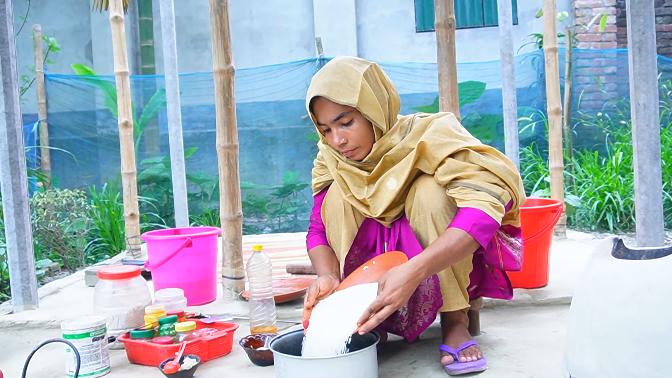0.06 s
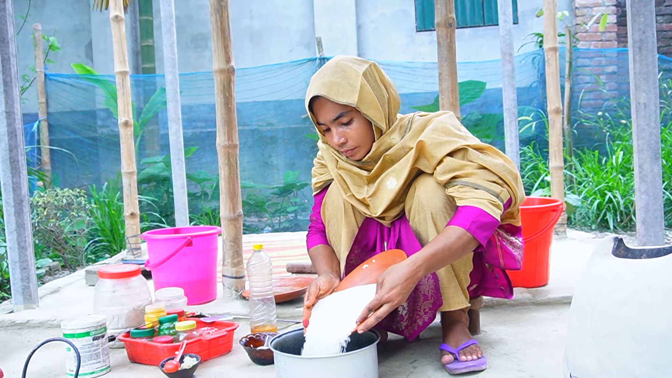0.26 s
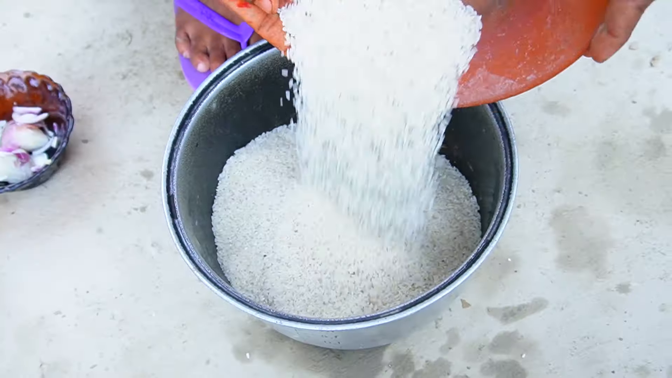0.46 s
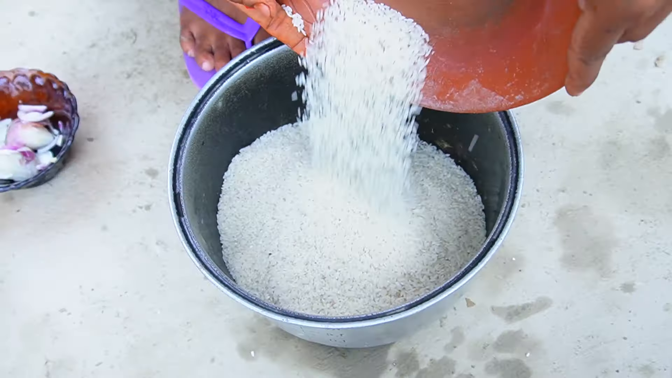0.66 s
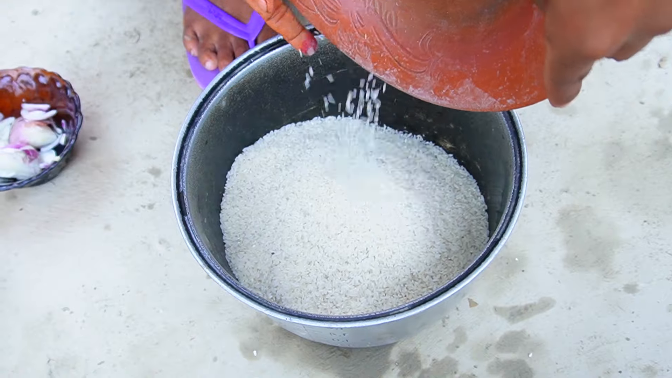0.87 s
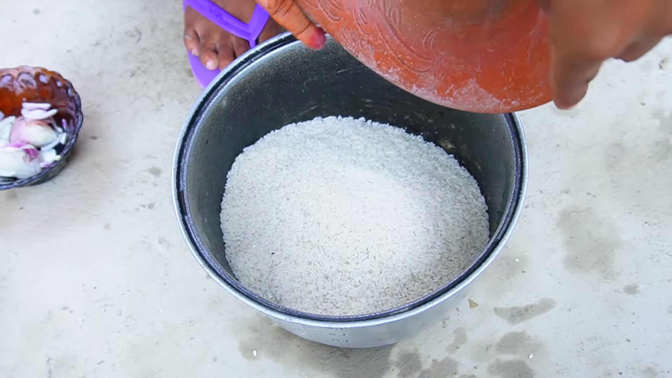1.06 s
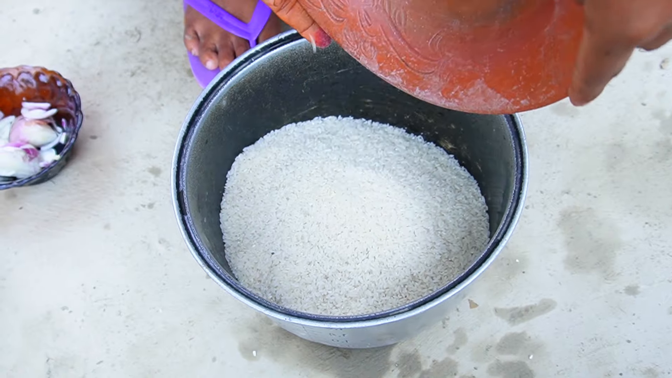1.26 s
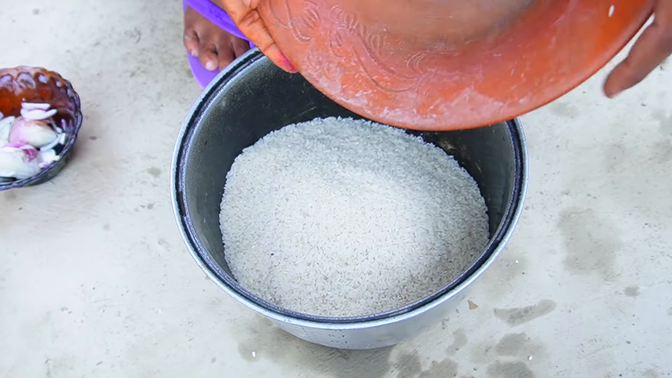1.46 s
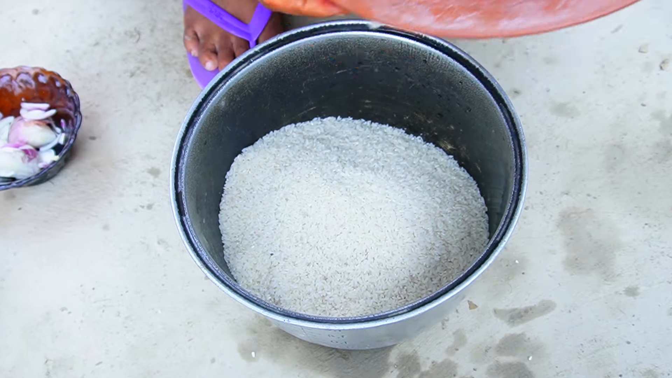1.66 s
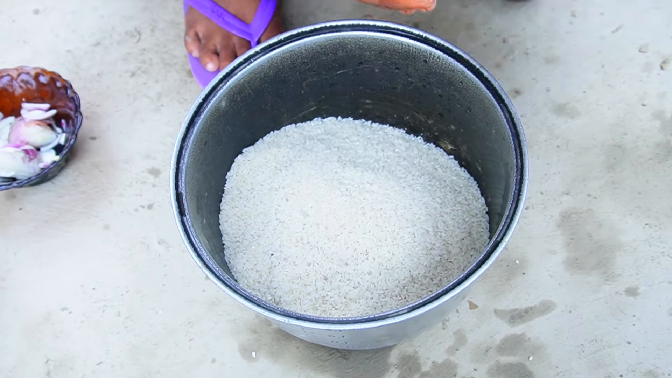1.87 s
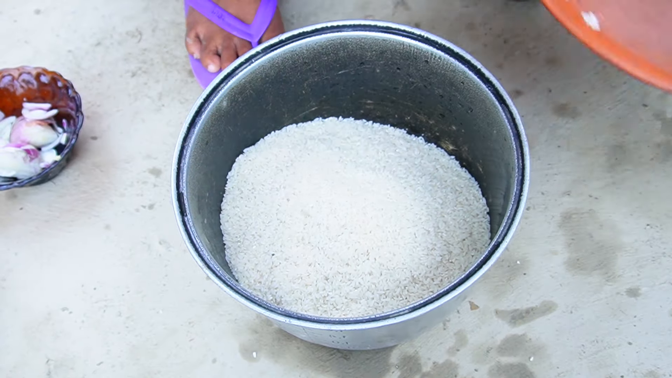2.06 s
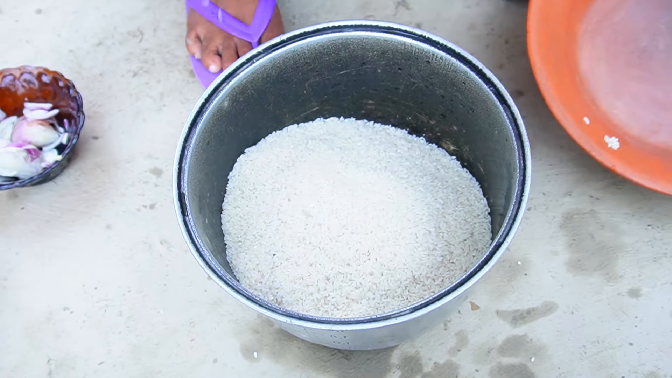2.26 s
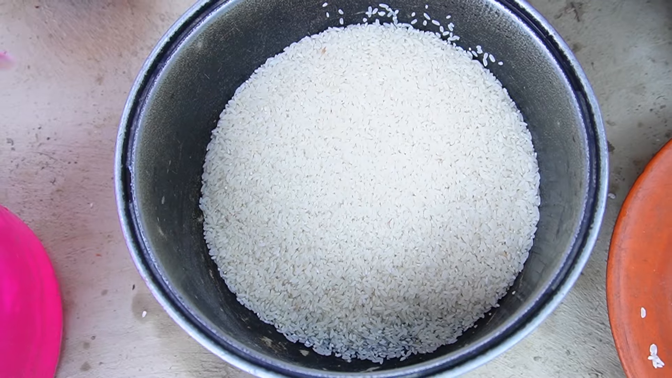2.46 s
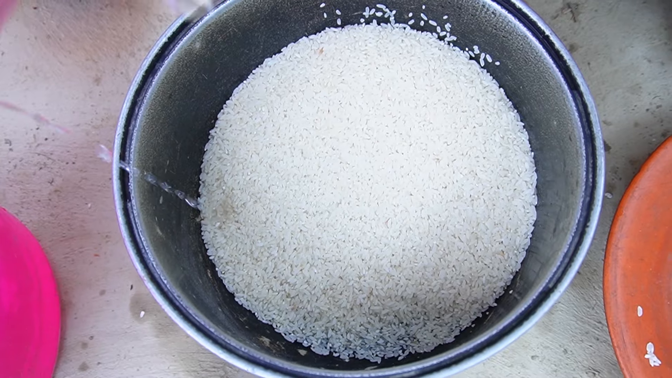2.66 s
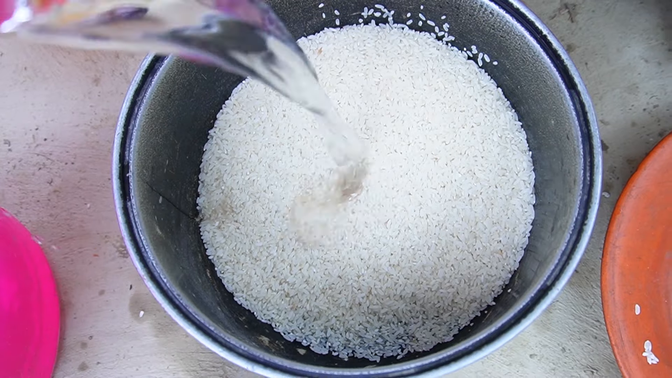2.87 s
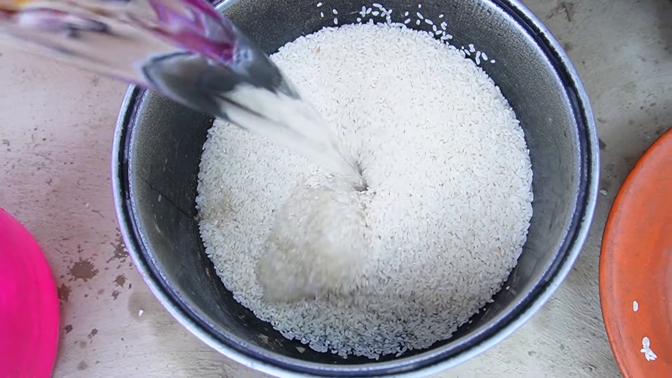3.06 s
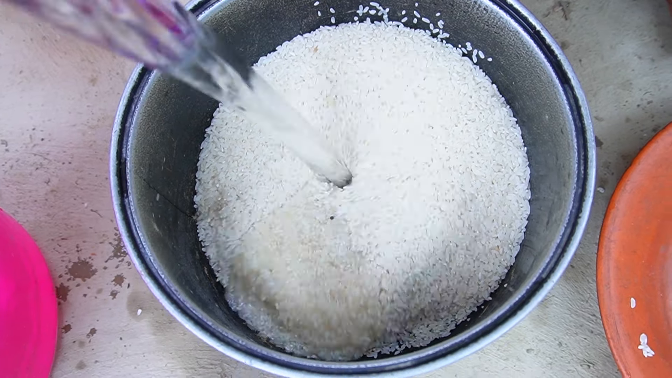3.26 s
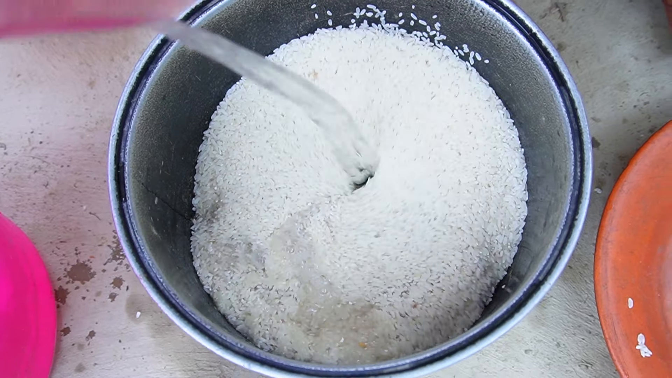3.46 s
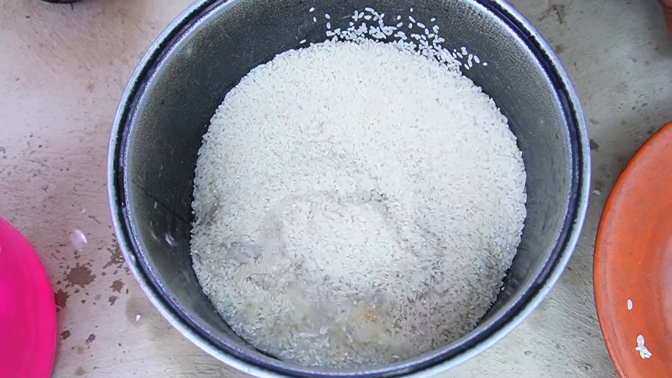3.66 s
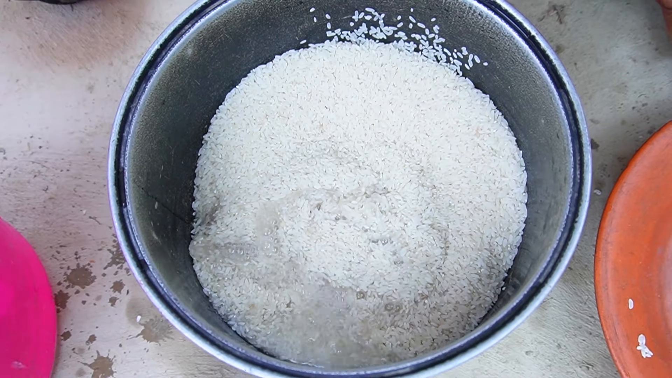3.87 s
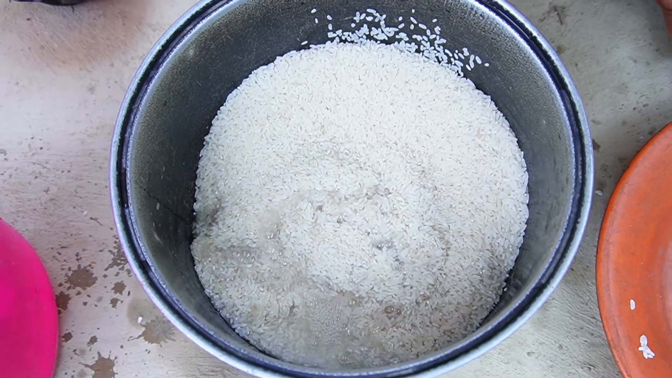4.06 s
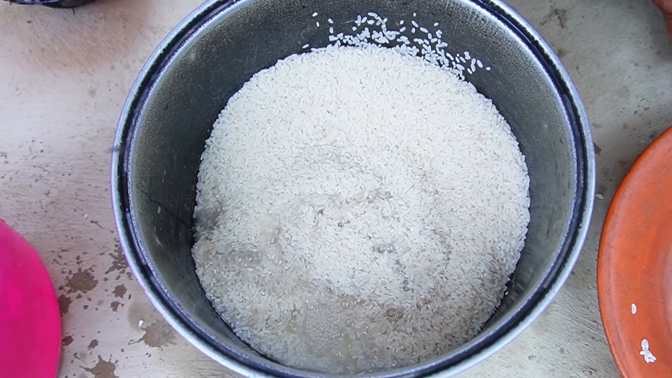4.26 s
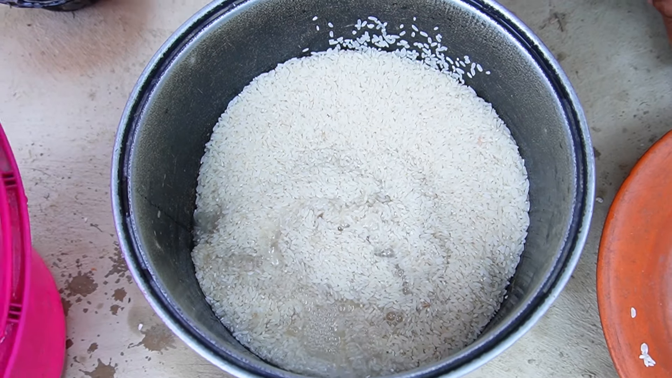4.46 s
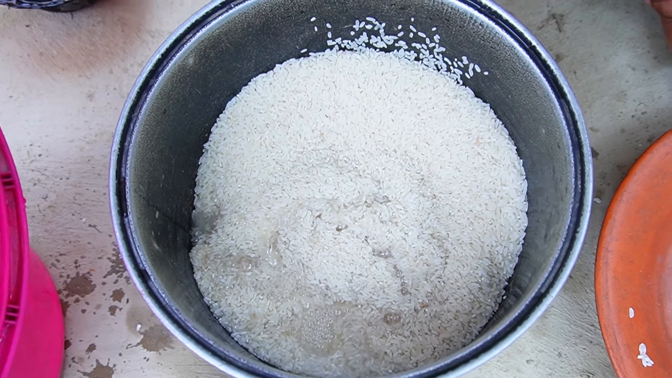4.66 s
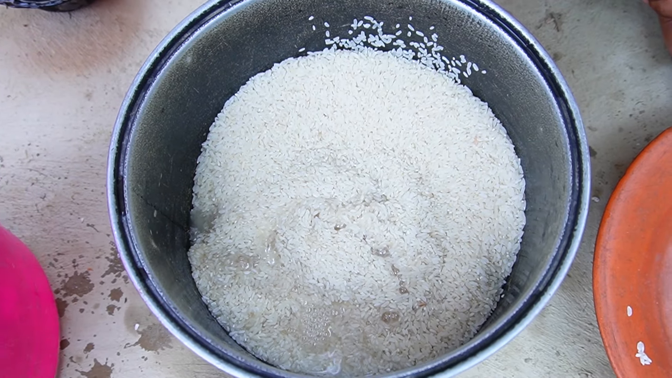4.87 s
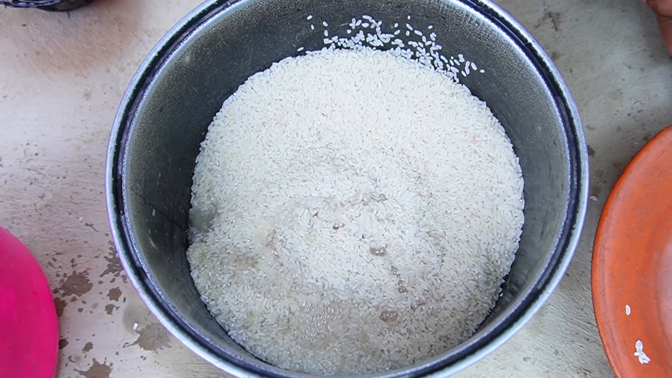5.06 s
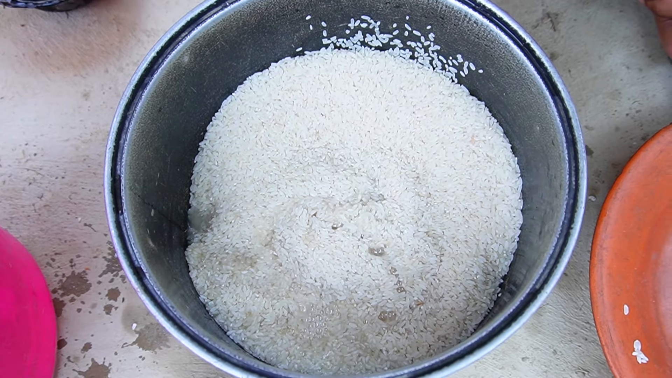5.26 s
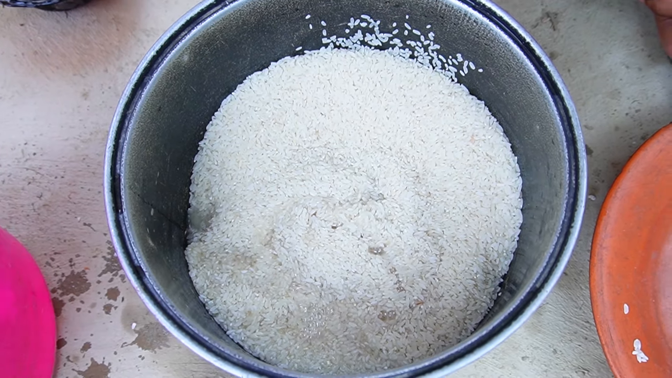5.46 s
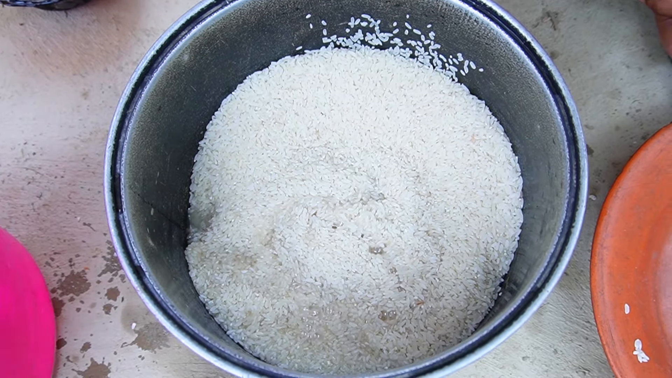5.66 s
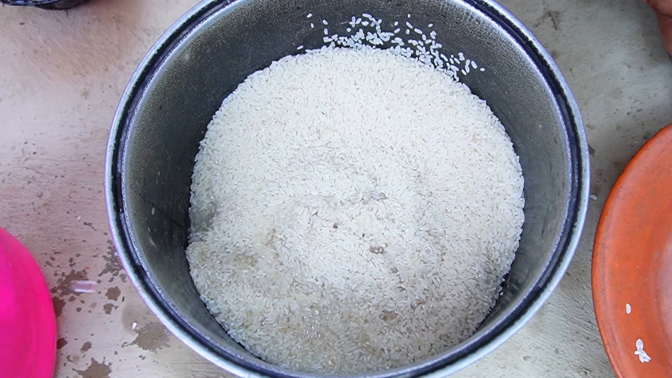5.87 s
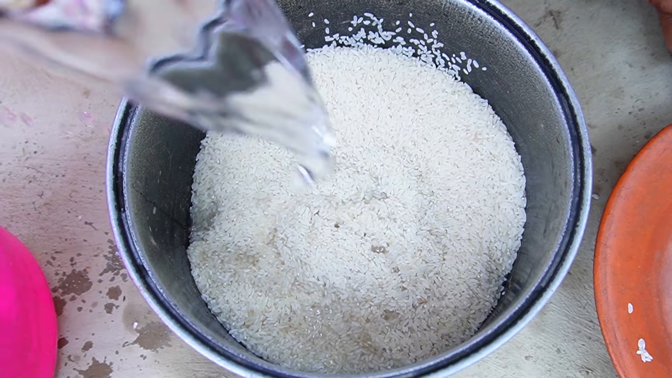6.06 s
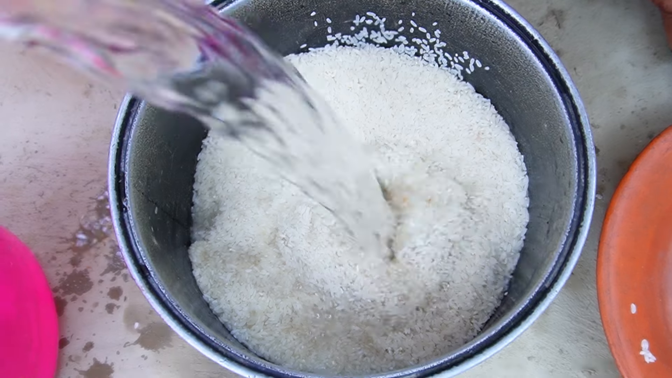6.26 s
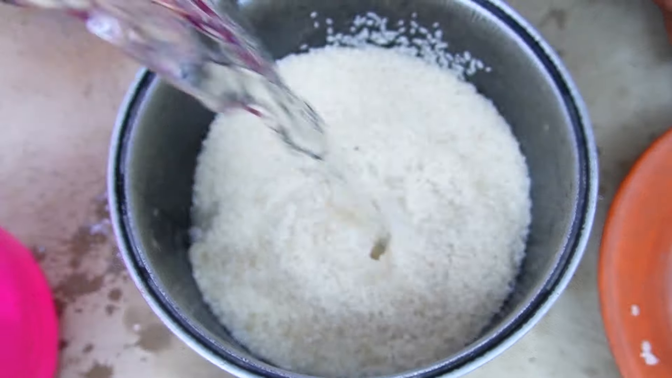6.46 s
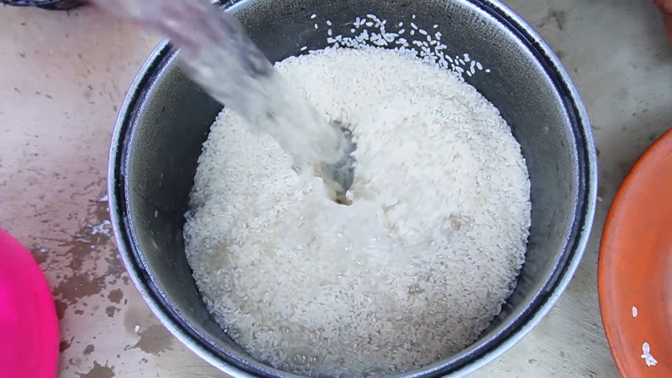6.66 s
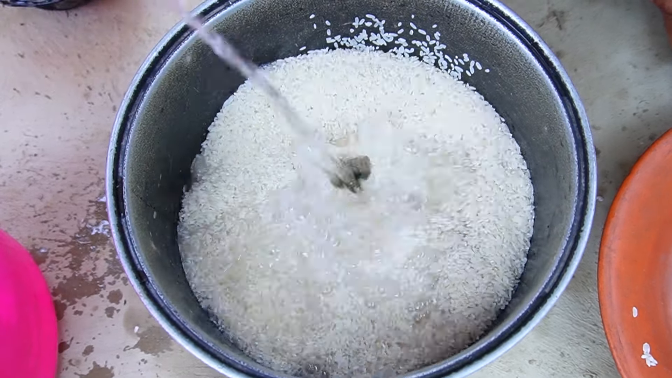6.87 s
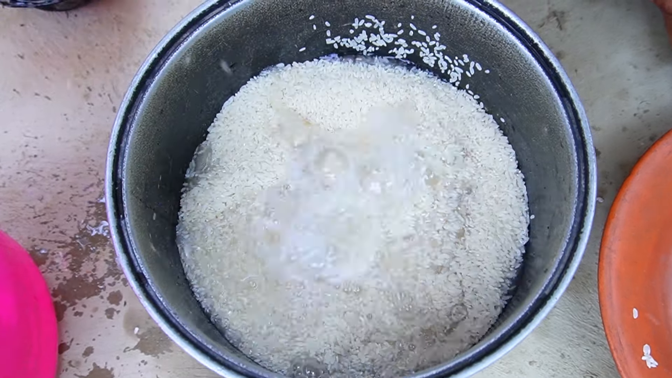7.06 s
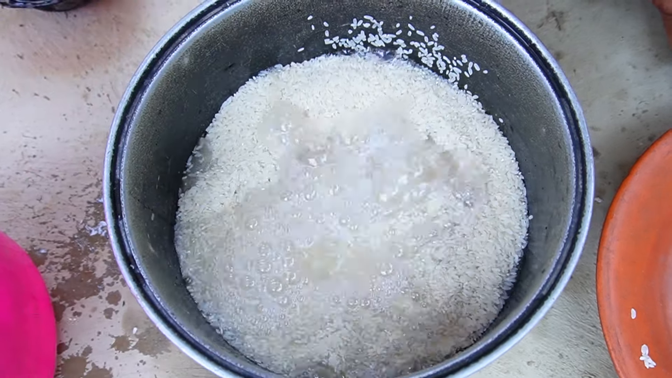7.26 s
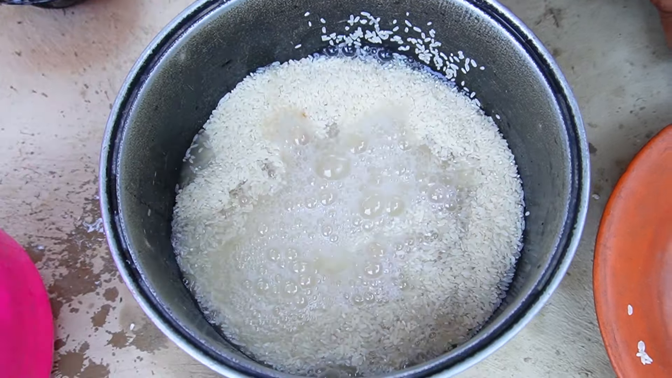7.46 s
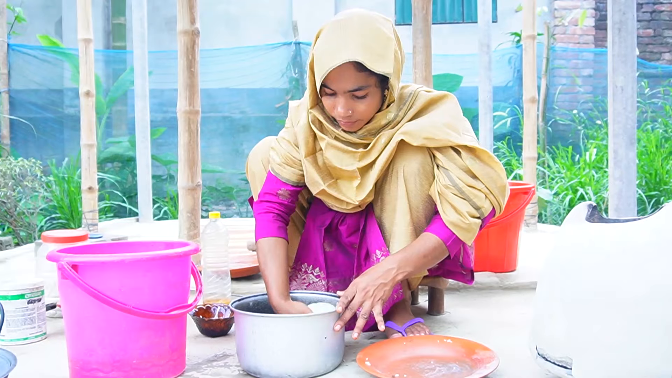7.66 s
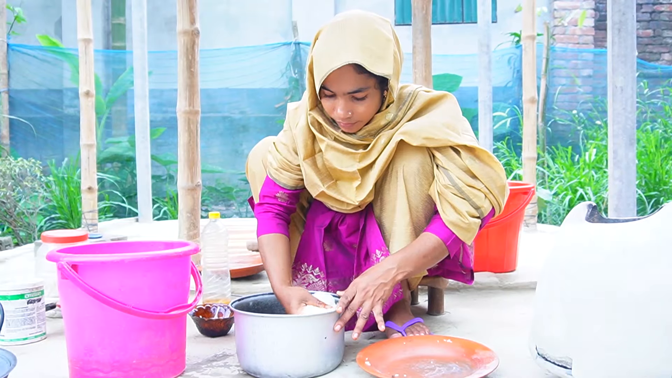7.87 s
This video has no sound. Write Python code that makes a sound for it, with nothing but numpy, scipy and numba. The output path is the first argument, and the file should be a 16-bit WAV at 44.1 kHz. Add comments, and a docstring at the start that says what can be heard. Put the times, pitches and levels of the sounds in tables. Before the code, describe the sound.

Dry rice hisses into a metal pot, a bird chirps, then water splashes onto it, a jug dips and gulps, and water pours again.

```python
"""Rice, water and a bird outdoors

Raw rice slides off a plate into a metal pot while a bird calls; a jug of water is poured on it, dipped into
a bucket to refill and poured again; last drops fall and a hand starts to stir. Rice, bubbles and grit are
swarms of decaying sines, slaps are noise bursts ringing the vessels, the bird is a rasp turning to whistle.
Underneath: low rumble, faint hiss and, later, a low hum."""
import sys
import numpy as np
from scipy import signal
from scipy.fft import rfft, irfft
from scipy.io import wavfile
from numba import njit

SR = 44100
rng = np.random.default_rng(int(sys.argv[2]) if len(sys.argv) > 2 else 0)


def unload_audio(sound):
    """Save the sound as a 16-bit wav file, at the path given as the first command line argument."""
    columns = np.transpose(np.atleast_2d(sound))
    # keep every value between -1 and 1, then stretch to whole-number steps
    steps = np.round(np.clip(columns, -1, 1) * 32767)
    wavfile.write(sys.argv[1], SR, steps.astype(np.int16))


N = 349713
T = np.arange(N) / SR
FREQS_HZ = np.maximum(np.fft.rfftfreq(N, 1 / SR), 1)
TOP_HZ = 15800

# rice off the plate, then the rest shaken out: start_s, stop_s, level_db, trickle_t60_s
RICE_SLIDES = [(0, 0.75, -29.5, 0.8), (1.515, 1.587, -41, 0.33)]
# rice spectrum: freq_hz, gain_db
RICE_SPECTRUM = [(1200, -34), (2800, -23.5), (4000, -5.5), (5200, 1.5), (8000, 3), (15500, -2.5)]
RICE_ATTACK_S = 0.0016
# grains and droplets ticking on hard surfaces: start_s, peak_db, lowest_hz
TICKS = [(0.0094, -9, 3970), (0.039, -7.5, 4160), (0.0533, -10.5, 3900), (0.1196, -17, 3800),
         (0.2837, -12.5, 5000), (1.272, -30.5, 3300), (2.047, -32.5, 3670), (2.757, -26, 5500),
         (2.776, -23, 6250), (2.806, -17, 5960), (3.999, -20.5, 5530)]

# outdoor rumble spectrum: freq_hz, gain_db
RUMBLE_SPECTRUM = [(25, -35), (70, 0.5), (140, -10.5), (200, -3.5), (300, -22), (700, -33.5), (2500, -39.5),
                   (4000, -68.5)]
# hiss spectrum: freq_hz, gain_db
HISS_SPECTRUM = [(2750, -21), (3130, 1), (5000, 0), (7400, -10), (7900, -16.5), (9400, -20.5),
                 (10200, -48.5), (15000, -56)]
RUMBLE_DB, HISS_START_DB = -59.5, -52.5
LATER_S, HISS_STEP_DB, HUM_DB = 2.39, -2.5, -55

# rubs and bumps of plate and jug: start_s, length_s, pitch_hz, width_hz, level_db
RUBS = [(0.392, 0.23, 1470, 497, -55.5), (1.265, 0.13, 422, 49.4, -60.5), (1.449, 0.25, 2620, 230, -46),
        (2.178, 0.11, 1080, 220, -60), (2.419, 0.25, 70, 35, -48.5), (2.658, 0.1, 137, 29.8, -47),
        (2.803, 0.044, 1770, 500, -59.5), (4.589, 0.057, 193, 90, -36), (4.927, 0.054, 119, 69.6, -42.5)]
# bird notes: start_s, length_s, pitch_hz, relative_level_db, rasp_vs_whistle_db
BIRD_NOTES = [(0.655, 0.06, 5055, -10.5, -2.5), (0.709, 0.086, 3280, -9, -5), (0.41, 0.19, 2586, -42, 4),
              (1.912, 0.09, 2710, -47.5, 6.5), (2.49, 0.081, 2640, -53.5, 2),
              (5.736, 0.071, 2680, -45.5, 2.5)]
SQUEAK_S, SQUEAK_LENGTH_S, SQUEAK_DB = 1.546, 0.44, -56.5
SQUEAK_FROM_HZ, SQUEAK_TO_HZ = 800, 1036

# jugs emptied on the rice: start_s, stop_s, attack_s, swell_db, puddle_time_constant_s,
# spray_db, small_bubbles_db, deep_bubbles_db, cutoff_t60_s, soaking_fizz_db
POURS = [(2.879, 3.647, 0.029, 10, 0.14, -10.5, -16.5, -51, 0.12, -24.5),
         (6.199, 6.991, 0.068, 2, 0.073, -11.5, -14.5, -23.5, 0.19, -10.5)]
# stream on rice, spectrum: freq_hz, gain_db
POUR_SPECTRUM = [(220, -9), (320, -22), (400, -12.5), (630, -3), (780, -8), (1400, 2.5), (3300, 5.5),
                 (6200, 1), (9000, -4.5), (15500, -12.5)]
FIRST_BUBBLE_HZ = 4640  # lowest pitch on dry rice; sinks as the puddle deepens
SOAK_T60_S, SETTLE_T60_S = 1, 0.76  # fizz of soaking; larger bubbles settle sooner
POT_HZ, POT_WIDTH_HZ, POT_VS_SMALL_DB = 580, 120, -28.5
# hollows drilled in dry rice by the stream: start_s, length_s, pitch_hz, level_db
HOLLOWS = [(2.962, 0.029, 3730, -21.5), (3.015, .065, 3880, -21)]
HOLLOW_Q = 6.25

# slaps of water, relative levels: start_s, mid_db, hollow_thud_db, bright_splash_db
SLAPS = [(3.139, -20, -38, -10), (4.193, -9, -18.5, -55), (4.219, -18.5, -31, -54),
         (4.24, -16, -32.5, -44.5), (4.6003, -15, -14, -34), (4.6135, -39.5, -13.5, -11),
         (4.968, -32, -30, -27.5), (5.0158, -15.5, -35.5, -33.5), (5.11, -17, -52.5, -50),
         (5.3076, -25, -47, -37.5), (6.187, -8.5, -35, -44), (6.209, -29, -50, -10.5),
         (6.286, -30, -45, -3), (6.304, -6, -38, -6.5), (7.037, -10, -22, -21), (7.0759, -33, -16, -7.5),
         (7.1913, -30, -33, -16.5), (7.4041, -31, -42.5, -6), (7.540, -10, -20, -35.5),
         (7.6047, -20.5, -25.5, -35), (7.703, -26.5, -62, -58)]
# vessel resonances: pitch_hz, width_hz, gain_db
VESSEL_MODES = [(380, 12, -3), (653, 16, 2), (929, 110, 6.5), (1516, 230, 12), (1936, 87, 10),
                (2430, 256, 6), (4530, 1700, 1.5), (7940, 13000, -10.5)]
SLAP_RISE_S = 0.0013
# waves in jug, bucket and pot: start_s, length_s, level_db, deep_vs_level_db, spray_vs_level_db
SLOSHES = [(3.77, 0.13, -29, 0.5, -10.5), (3.986, 0.05, -34, -9, -10), (4.135, 0.16, -33, -10, -8),
           (4.321, 0.15, -35, -16, -6.5), (4.453, 0.071, -34, 3.5, -4.5), (4.592, 0.061, -29.5, 5, -8),
           (4.69, 0.14, -32.5, -1, -23), (4.853, 0.12, -32.5, -20, -12), (5.005, 0.23, -33.5, -25.5, -3.5),
           (5.291, 0.061, -41, -26, -5), (7.401, 0.059, -40, -8, -5), (7.515, 0.14, -40, 0.5, -0.5)]
# swirling water, spectrum: freq_hz, gain_db
SWIRL_SPECTRUM = [(250, -24), (410, -2), (650, -16), (850, -2), (1450, 8.5), (2200, 7), (2750, 5),
                  (3500, 0.5), (7000, -11), (14000, -49.5)]
SLOSH_ATTACK_S, SLOSH_T60_S = .018, 0.19
# single big bubbles: start_s, relative_level_db, starting_pitch_hz
PLOPS = [(4.010, -10, 1243), (4.161, -10.5, 1400), (4.195, -22.5, 376), (4.424, -21, 760),
         (4.443, -3.5, 632), (4.478, -15.5, 540), (4.480, -12, 2570), (4.613, -11.5, 392),
         (4.902, -12.5, 1930), (4.995, -2, 3810), (5.086, -15.5, 1540), (5.177, -13.5, 1940),
         (5.217, -14.5, 2300), (5.244, 2.5, 3700), (5.308, -1.5, 4530), (5.386, -20, 1946),
         (6.473, 6, 2740), (6.634, -7.5, 631), (7.037, -12.5, 603), (7.084, -20, 826), (7.125, -9, 4300),
         (7.190, -8.5, 2990), (7.275, -24.5, 1116), (7.907, -21, 777)]
PLOP_CYCLES = 53  # cycles per 60 dB decay: big bubbles ring longer
PLOP_MAX_T60_S = 0.081  # the largest burst before they have rung out
# air gulping out of the sunken jug, relative level: start_s, mid_db, rise_s
GLUGS = [(4.652, -11.5, 0.0089), (4.719, -11, 0.0028), (4.770, -17, 0.0091)]
GLUG_THUD_VS_MID_DB, GLUG_SPLASH_VS_MID_DB = -22, -40
GLUG_AIR_HZ, GLUG_AIR_VS_MID_DB = 384, -7.5  # the pocket of air rings on

DROPS_START_S, DROPS_GAP_S = 7.009, 0.011
DROPS_FIRST_DB, DROPS_STEP_DB = -8, -3.5
STIR_S, STIR_START_DB, STIR_SWELL_DB = 7.68, -38.5, 7
BUCKET_PAN_DB = 3.5  # left over right
# side-channel spectrum against mid: freq_hz, gain_db
WIDTH_SPECTRUM = [(1000, -34.5), (5000, -11), (13000, -6.5)]


def undb(db):
    """Decibels to gain."""
    return 10 ** (np.asarray(db) / 20)


def unit(x):
    """Scale to rms 1."""
    return x / np.sqrt(np.mean(x ** 2))


def add(out, x, start_s):
    """Mix x into out from start_s."""
    i = max(int(start_s * SR), 0)
    out[i:i + len(x)] += x[:len(out) - i]


def colour(x, points):
    """Shape x with (freq_hz, gain_db) points, interpolated over log frequency."""
    hz, db = np.transpose(points)
    gain = undb(np.interp(np.log(FREQS_HZ), np.log(hz), db))
    return irfft(rfft(x) * gain, N)


def band(x, lo_hz, hi_hz, order=3):
    """Causal band-pass."""
    edges_hz = [lo_hz, min(hi_hz, .48 * SR)]
    return signal.sosfilt(signal.butter(order, edges_hz, "band", fs=SR, output="sos"), x)


def resonate(x, hz, width_hz):
    """One resonance, gain 1 at its centre."""
    return signal.lfilter(*signal.iirpeak(hz, hz / width_hz, fs=SR), x)


def fade(t_s, t60_s):
    """Exponential decay, 60 dB down after t60_s."""
    return np.exp(-np.log(1000) * t_s / t60_s)


def envelope(start_s, stop_s, attack_s, t60_s):
    """Exponential rise from start, hold until stop, then decay."""
    rise = 1 - np.exp(-np.maximum(T - start_s, 0) / attack_s)
    return rise * fade(np.maximum(T - stop_s, 0), t60_s)


def flutter(rate_hz):
    """Slow random wander, rms 1, between knots at rate_hz."""
    knots = rng.standard_normal(int(rate_hz * N / SR) + 2)
    return unit(np.interp(T * rate_hz, np.arange(len(knots)), knots))


def echoes(x, t60_s):
    """Diffuse tail: convolution with decaying noise of unit energy."""
    t_s = T[:int(t60_s * SR)]
    tail = rng.standard_normal(len(t_s)) * fade(t_s, t60_s)
    return signal.fftconvolve(x, tail / np.linalg.norm(tail))[:len(x)]


@njit
def ring(starts, hz, cycles, size, glide):
    """Sines that swell quickly and die within their number of cycles; pitch rises by the fraction glide."""
    out = np.zeros(N)
    for k in range(len(starts)):
        length = cycles[k] * SR / hz[k]
        z = size[k] + 0j
        step = np.exp(2j * np.pi * hz[k] / SR - 6 / length)  # rotation and decay per sample
        bend = np.exp(2j * np.pi * hz[k] / SR * glide / length)
        closed, opening = 1., np.exp(-20 / length)
        first = int(starts[k])
        for i in range(first, min(N, first + int(length))):
            out[i] += z.imag * (1 - closed)
            closed *= opening
            z *= step
            step *= bend
    return out


def grains(rate_hz, lo_hz, hi_hz, cycles, spread_db, glide):
    """A steady swarm of tiny rings of random time, pitch, damping and size."""
    own_rng = np.random.default_rng(rng.integers(1 << 30))
    when, pitch, damping, size = own_rng.random((int(rate_hz * N / SR), 4)).T
    hz = lo_hz * (min(hi_hz, TOP_HZ) / lo_hz) ** pitch
    amplitude = undb(-spread_db * np.log(size + .01)) * hz / hi_hz
    return ring(when * N, hz, cycles * (.5 + damping), amplitude, glide)


def swell(length_s, hz, width_hz, db):
    """A short swell of noise through one doubled resonance."""
    size = int(length_s * SR)
    ringing = resonate(resonate(rng.standard_normal(size), hz, width_hz), hz, width_hz)
    return undb(db) * unit(ringing * signal.windows.tukey(size, .5))


def rice():
    """Thousands of dry grains land on the heap; as the flow thins, only the bright ticks remain."""
    impacts = grains(rate_hz=7000, lo_hz=1200, hi_hz=15500, cycles=4, spread_db=2.8, glide=0.)
    patter = unit(colour(impacts, RICE_SPECTRUM))
    bright = band(patter, 5200, 18000)
    flow = sum(undb(db) * envelope(start_s, stop_s, RICE_ATTACK_S, t60_s)
               for start_s, stop_s, db, t60_s in RICE_SLIDES)
    fullness = np.clip(flow / undb(-42.0), 0, 1)
    blend = fullness * patter + np.sqrt(1 - fullness ** 2) * bright
    return undb(1.4 * flutter(40.5)) * flow * blend


def background():
    """Outdoor rumble and thin hiss; from LATER_S the hiss is lower and a low hum is heard."""
    later = np.clip((T - LATER_S) / .05, 0, 1)
    rumble = unit(colour(rng.standard_normal(N), RUMBLE_SPECTRUM)) * undb(RUMBLE_DB)
    hiss_db = HISS_START_DB + HISS_STEP_DB * later
    hiss = unit(colour(rng.standard_normal(N), HISS_SPECTRUM)) * undb(hiss_db)
    hum_noise = unit(band(rng.standard_normal(N), 70, 99.7, order=2))
    hum = unit(np.sin(2 * np.pi * 75 * T) + .5 * hum_noise)
    return rumble + hiss + hum * later * undb(HUM_DB)


def ticks():
    """Lone hard clicks with a brief ring: band-passed noise with fast and slow decays."""
    out = np.zeros(N)
    t_s = T[:2048]
    for start_s, db, lo_hz in TICKS:
        decay = fade(t_s, .008) + undb(-14) * fade(t_s, .05)
        click = band(rng.standard_normal(len(t_s)) * decay, lo_hz, 2.2 * lo_hz, order=4)
        add(out, undb(db) * click / np.abs(click).max(), start_s)
    return out


def rubs():
    """Plate and jug are shifted about: brief dull friction in one resonance."""
    out = np.zeros(N)
    for start_s, *shape in RUBS:
        add(out, swell(*shape), start_s)
    return out


def bird():
    """Notes open with a rasp and settle into a clean whistle; diffuse reflections make them beat."""
    out = np.zeros(N)
    for start_s, length_s, hz, db, rasp_db in BIRD_NOTES:
        u = np.linspace(0, 1, int(length_s * SR))
        waver = .014 * flutter(250)[:len(u)]
        whistle = np.sqrt(2) * np.sin(2 * np.pi * np.cumsum(hz * (1 + waver)) / SR)
        rasp = unit(band(rng.standard_normal(len(u)), .86 * hz, 1.12 * hz, order=3))
        note = 2 * u * whistle + undb(rasp_db) * (1 - u) * rasp
        add(out, undb(db) * np.sin(np.pi * u) * note, start_s)
    return .7 * out + .4 * echoes(out, t60_s=.2) + .03 * echoes(out, t60_s=.7)


def squeak():
    """A faint broken squeal, perhaps the plate being taken away: a wavering sine rises, then levels off."""
    u = np.clip((T - SQUEAK_S) / SQUEAK_LENGTH_S, 0, 1)
    glide_hz = SQUEAK_TO_HZ + (SQUEAK_FROM_HZ - SQUEAK_TO_HZ) * (1 - u) ** 4
    hz = glide_hz * (1 + .045 * flutter(400))
    grip = undb(4 * flutter(60) - 1)
    tone = np.sqrt(2) * np.sin(2 * np.pi * np.cumsum(hz) / SR)
    return undb(SQUEAK_DB) * grip * np.sin(np.pi * u) * tone


def stream(start_s, stop_s, attack_s, swell_db, spray_db, small_db, deep_db, t60_s, soak_db):
    """Flows of spray, small and deep bubbles in one pour: the first two swell as the jug tips; all die away."""
    tipping = undb(swell_db * np.clip((T - stop_s) / (stop_s - start_s), -1, 0))
    falling = envelope(start_s, stop_s, attack_s, t60_s)
    soaking = undb(soak_db) * envelope(start_s, stop_s, attack_s, SOAK_T60_S)
    settling = undb(soak_db) * envelope(start_s, stop_s, attack_s, SETTLE_T60_S)
    return np.array([undb(spray_db) * tipping * np.maximum(falling, soaking),
                     undb(small_db) * tipping * np.maximum(falling, settling),
                     undb(deep_db) * np.maximum(falling, settling)])


def water(flows, spectrum, swarms, surge_db):
    """Spray, small and deep bubbles, each swelling with its own flow; the deep ones come in lumps."""
    surge = flutter(55)
    bands = [(3060, 18000, 0.55), (880, 3540, 1.0), (199.5, 1210, 2.35)]  # lo_hz, hi_hz, lumpiness
    out = 0
    for flow, swarm, (lo_hz, hi_hz, lumps) in zip(flows, swarms, bands):
        bubbles = band(colour(swarm, spectrum), lo_hz, hi_hz)
        out = out + flow * unit(bubbles * undb(surge_db * lumps * surge))
    return out


def high_pass(x, edge_hz, size=512):
    """A high-pass whose edge moves with time."""
    hz, t_s, frames = signal.stft(x, SR, nperseg=size)
    gain = 1 / (1 + (np.interp(t_s, T, edge_hz) / np.maximum(hz, 1)[:, None]) ** 5)
    return signal.istft(frames * gain, SR)[1][:N]


def pours():
    """The stream fizzes on dry rice and rings the pot, then traps ever larger, lower bubbles as a pool forms."""
    spray = grains(rate_hz=8500, lo_hz=2400, hi_hz=15500, cycles=38, spread_db=3.2, glide=.03)
    small = grains(rate_hz=1800, lo_hz=850, hi_hz=3300, cycles=17, spread_db=3.0, glide=.06)
    deep = grains(rate_hz=550, lo_hz=200, hi_hz=1200, cycles=16, spread_db=2.3, glide=.06)
    flows, lowest_hz = 0, np.zeros(N)
    for start_s, stop_s, attack_s, swell_db, puddle_s, *levels in POURS:
        flows = flows + stream(start_s, stop_s, attack_s, swell_db, *levels)
        sinking_hz = FIRST_BUBBLE_HZ * np.exp(-np.maximum(T - start_s, 0) / puddle_s)
        lowest_hz = np.where(T > start_s, sinking_hz, lowest_hz)
    pot = resonate(rng.standard_normal(N), POT_HZ, POT_WIDTH_HZ)
    pot = unit(resonate(pot, POT_HZ, POT_WIDTH_HZ))
    splashing = water(flows, POUR_SPECTRUM, [spray, small, deep], surge_db=1.5)
    return high_pass(splashing + undb(POT_VS_SMALL_DB) * flows[1] * pot, lowest_hz)


def hollows():
    """Short-lived hollows in the heap, rung by the stream."""
    out = np.zeros(N)
    for start_s, length_s, hz, db in HOLLOWS:
        add(out, swell(length_s, hz, hz / HOLLOW_Q, db), start_s)
    return out


def smack(mid_db, thud_db, splash_db, rise_s=SLAP_RISE_S):
    """Water smacks a wall: a noise burst rings the vessel modes, all shifted by one random factor."""
    t_s = T[:8192]
    after_s = np.maximum(t_s - rise_s, 0)
    decay = fade(after_s, 0.016 + 2 * rise_s) + undb(-9.0) * fade(after_s, 0.06)
    burst = rng.standard_normal(len(t_s)) * decay * np.minimum(t_s / rise_s, 1)
    shift = rng.uniform(.93, 1.07)
    body = sum(undb(db) * resonate(burst, shift * hz, width_hz) for hz, width_hz, db in VESSEL_MODES)
    out = 0
    for db, lo_hz, hi_hz in [(thud_db, 260, 950), (mid_db, 1000, 2900), (splash_db, 3800, 9500)]:
        part = band(body, lo_hz, hi_hz)
        out = out + undb(db + 3.5) * part / np.abs(part).max()
    return out


def slaps():
    """Single slaps against jug, bucket and pot; the gentler ones set in more softly."""
    out = np.zeros(N)
    for start_s, *levels_db in SLAPS:
        softness = np.clip(undb(-9 - max(levels_db)), 1, 4)
        add(out, smack(*levels_db, softness * SLAP_RISE_S), start_s)
    return out


def swirls():
    """Slower water: a soft seething wash, filled with separate blips from the refill until the stirring."""
    wash = unit(grains(rate_hz=12000, lo_hz=250, hi_hz=14000, cycles=10, spread_db=1.5, glide=0.))
    plinks = unit(grains(rate_hz=300, lo_hz=2500, hi_hz=9000, cycles=55, spread_db=3.3, glide=.08))
    gurgle = unit(grains(rate_hz=900, lo_hz=300, hi_hz=3000, cycles=30, spread_db=2.5, glide=.1))
    bubbling = np.interp(T, [4.1, 4.45, 7.6, 7.7], [.2, .72, .72, .3])
    swarms = [np.sqrt(1 - bubbling ** 2) * wash + bubbling * x for x in (plinks, gurgle, gurgle)]
    flows = 0
    for start_s, length_s, db, deep_db, spray_db in SLOSHES:
        wave = envelope(start_s, start_s + length_s, SLOSH_ATTACK_S, SLOSH_T60_S)
        flows = flows + np.outer(undb([db + spray_db, db, db + deep_db]), wave)
    return water(flows, SWIRL_SPECTRUM, swarms, surge_db=3.0 * bubbling)


def bubble(db, hz):
    """A big bubble pinches off with a wet snap and rings, rising in pitch."""
    t_s = T[:8192]
    t60_s = min(PLOP_CYCLES / hz, PLOP_MAX_T60_S)
    tone = np.sin(2 * np.pi * hz * t_s * (1 + 0.06 * t_s / t60_s)) * fade(t_s, t60_s)
    snap = band(rng.standard_normal(len(t_s)) * fade(t_s, .03), .75 * hz, 1.25 * hz, order=2)
    onset = 1 - np.exp(-t_s / 0.0012)
    return undb(db) * (tone + undb(-12.5) * snap / np.abs(snap).max()) * onset


def plops():
    """Single big bubbles and drips."""
    out = np.zeros(N)
    for start_s, db, hz in PLOPS:
        add(out, bubble(db, hz), start_s)
    return out


def glugs():
    """The sunken jug fills in gulps: water wells up inside and the pocket of air rings."""
    out = np.zeros(N)
    for start_s, db, rise_s in GLUGS:
        add(out, smack(db, db + GLUG_THUD_VS_MID_DB, db + GLUG_SPLASH_VS_MID_DB, rise_s), start_s)
        add(out, bubble(db + GLUG_AIR_VS_MID_DB, GLUG_AIR_HZ), start_s + rise_s)
    return out


def last_drops(count):
    """The thinning second pour falls as separate, ever smaller drops into the puddle."""
    out = np.zeros(N)
    for k, late in enumerate(rng.uniform(-.2, .2, count)):
        db = DROPS_FIRST_DB + k * DROPS_STEP_DB
        add(out, smack(db - 20, db - 9, db), DROPS_START_S + (k + late) * DROPS_GAP_S)
    return out


def stir():
    """Fingers push through the wet rice: a gritty swish that swells as the hand gathers speed."""
    grit = grains(rate_hz=2200, lo_hz=1250, hi_hz=4400, cycles=22, spread_db=2.8, glide=0.)
    push = np.clip((T - STIR_S) / (T[-1] - STIR_S), 0, 1)
    level = undb(STIR_START_DB + STIR_SWELL_DB * push ** 6)
    return unit(grit) * level * envelope(STIR_S, T[-1], SLOSH_ATTACK_S, SLOSH_T60_S)


def place(x, pan_db):
    """Stereo: alike in the bass, wider in the treble by a diffuse side signal."""
    side = colour(echoes(x, t60_s=0.081), WIDTH_SPECTRUM)
    return np.array([undb(pan_db / 2) * (x + side), undb(-pan_db / 2) * (x - side)])


def scene():
    """Wet sounds with the short ring of the vessels and the yard, plus dry grains and surroundings."""
    hits = slaps() + glugs() + last_drops(count=8)
    blips = plops()
    vessel_ring = undb(-13) * echoes(hits + blips, t60_s=0.12)
    wet = hits + vessel_ring + pours() + hollows() + swirls() + stir()
    wet = wet + blips + undb(-12) * echoes(wet, t60_s=0.2)
    # bucket and stirring hand sit a little to the left
    pan_db = BUCKET_PAN_DB * np.interp(T, [3.7, 4, 5.5, 6.1, 7.42, 7.53], [0, 1, 1, 0, 0, 1])
    others = rice() + ticks() + bird() + rubs() + squeak() + background()
    return place(wet, pan_db) + place(others, pan_db=0)


def record(dry):
    """Peaks are rounded off at full scale and the top is cut at TOP_HZ."""
    rounded = dry / (1 + np.abs(dry) ** 6) ** (1 / 6)
    return signal.sosfilt(signal.ellip(10, .2, 70, TOP_HZ, fs=SR, output="sos"), rounded)


dry = scene()
out = record(dry)
unload_audio(out)
```